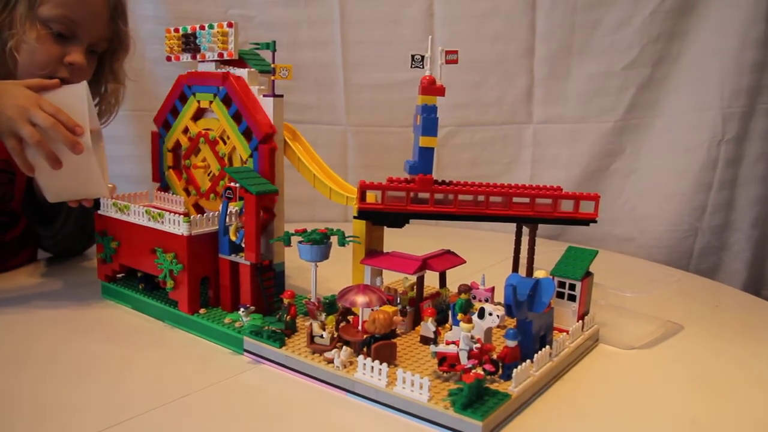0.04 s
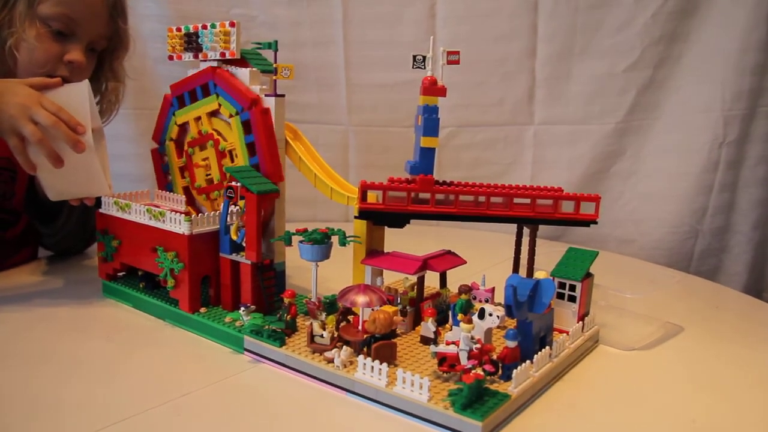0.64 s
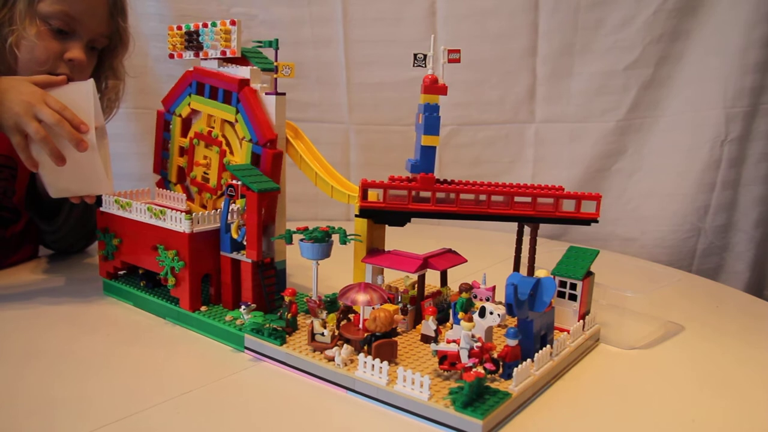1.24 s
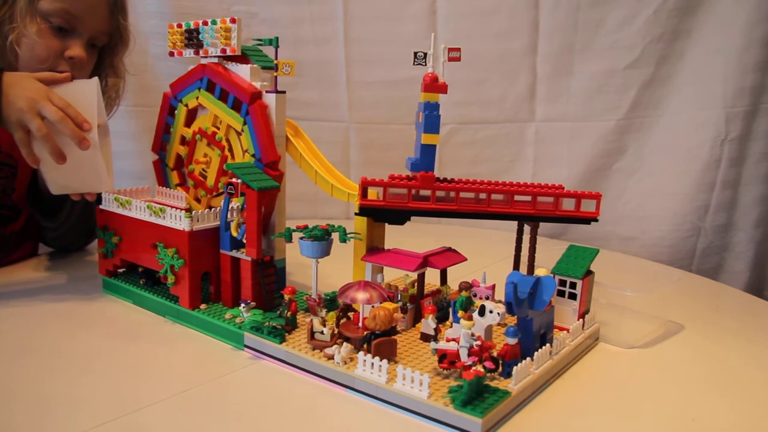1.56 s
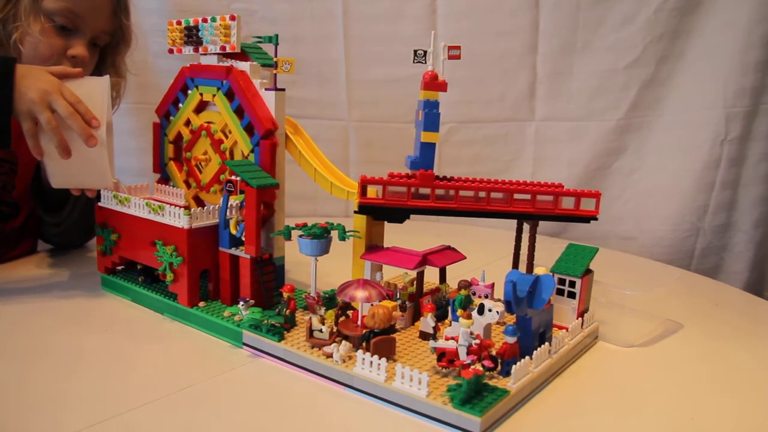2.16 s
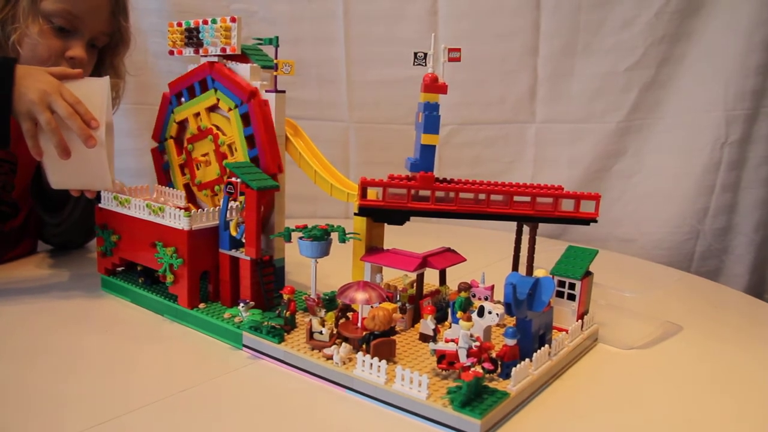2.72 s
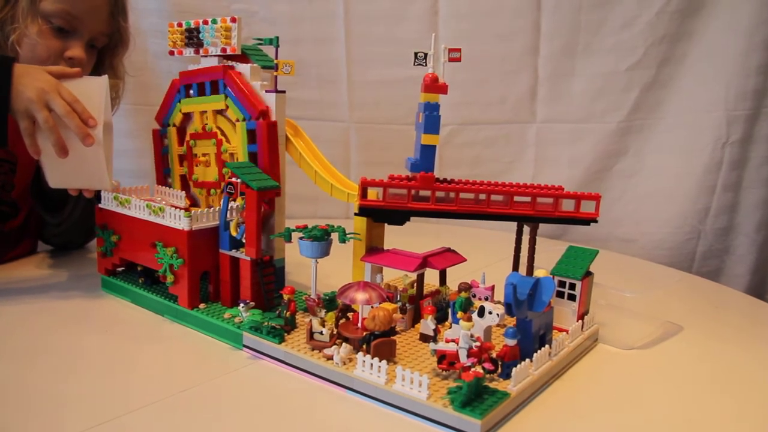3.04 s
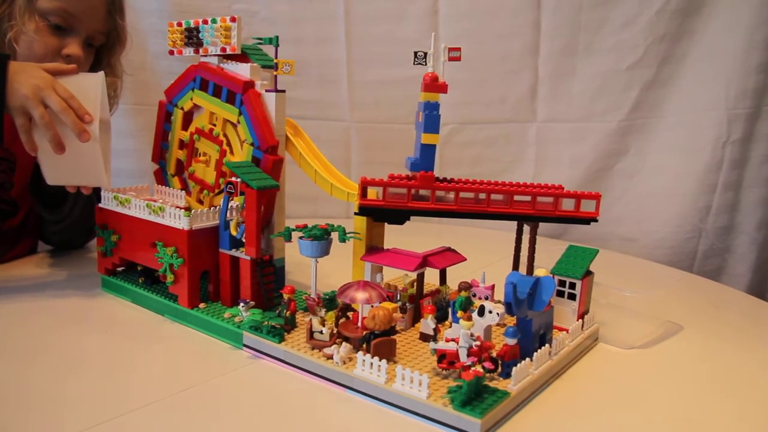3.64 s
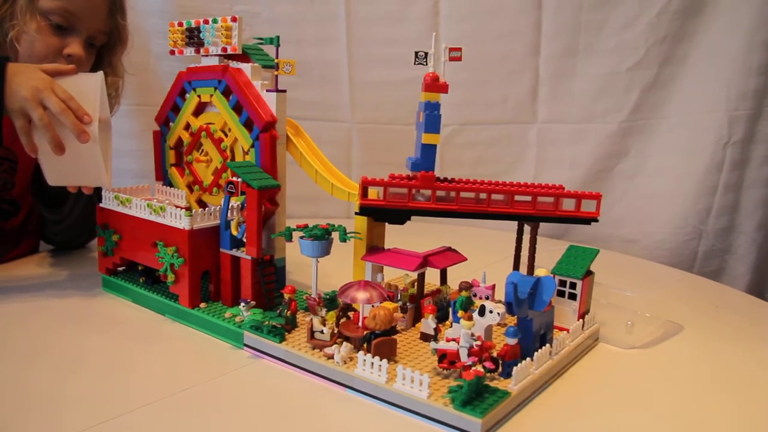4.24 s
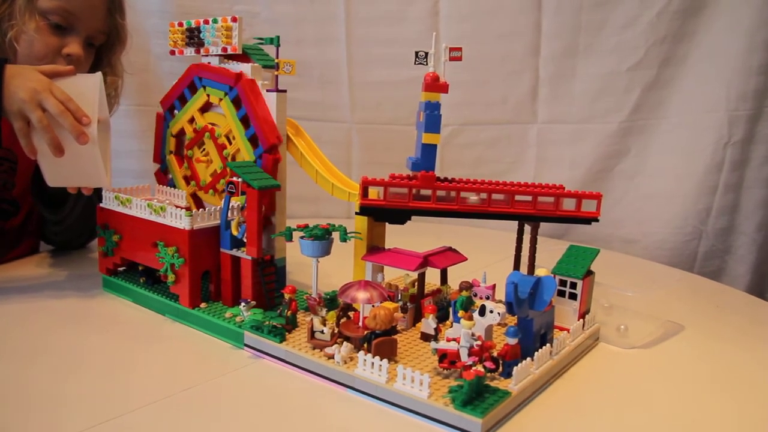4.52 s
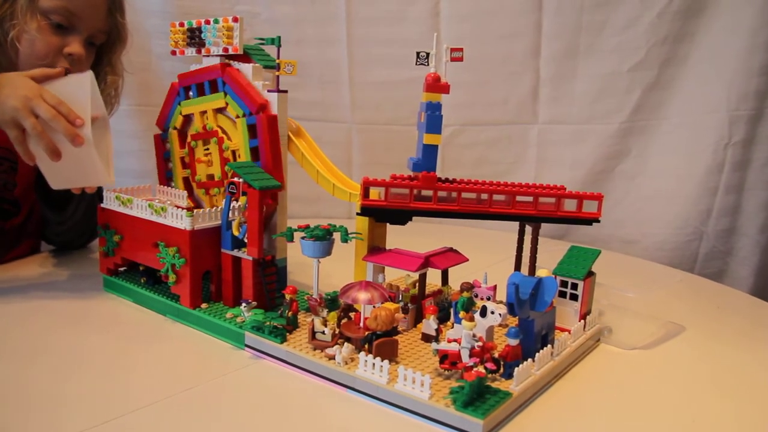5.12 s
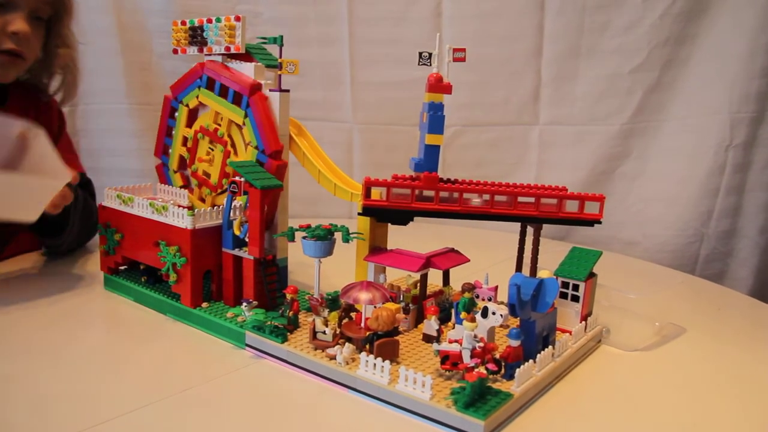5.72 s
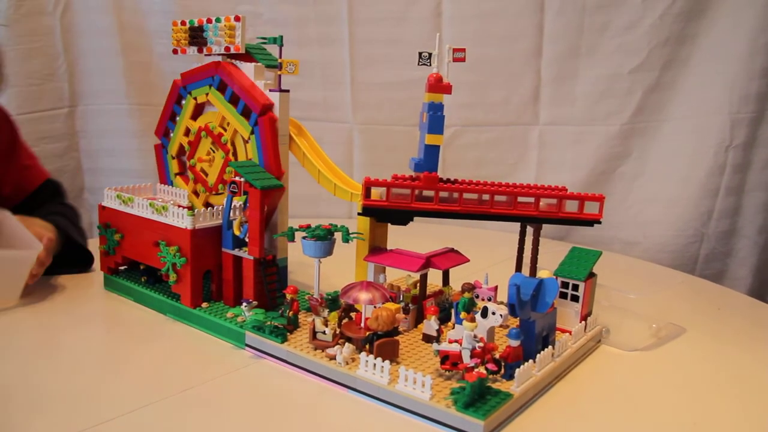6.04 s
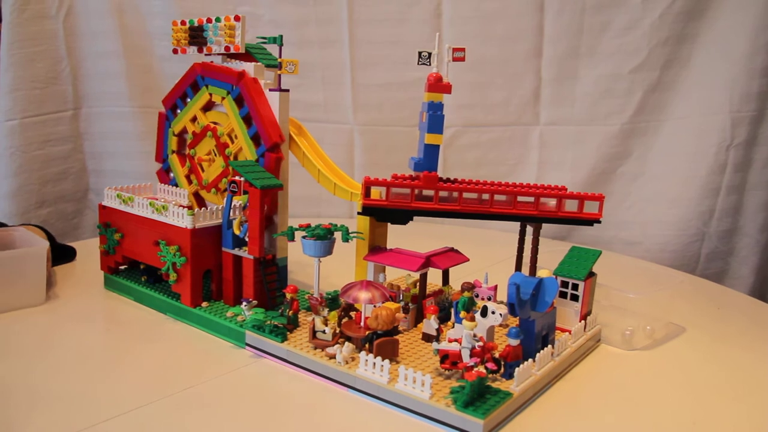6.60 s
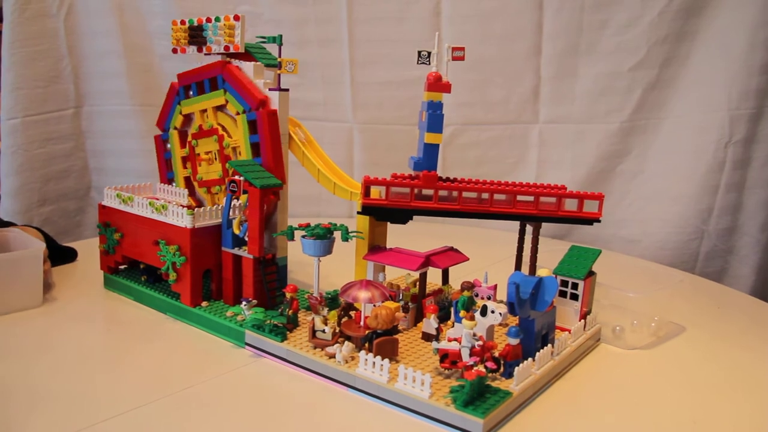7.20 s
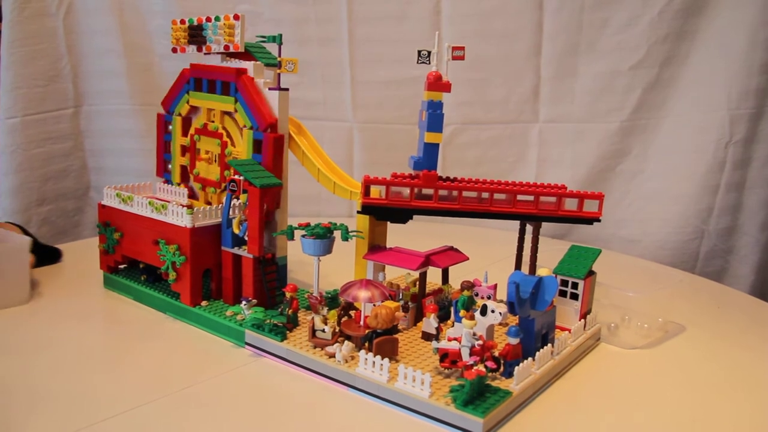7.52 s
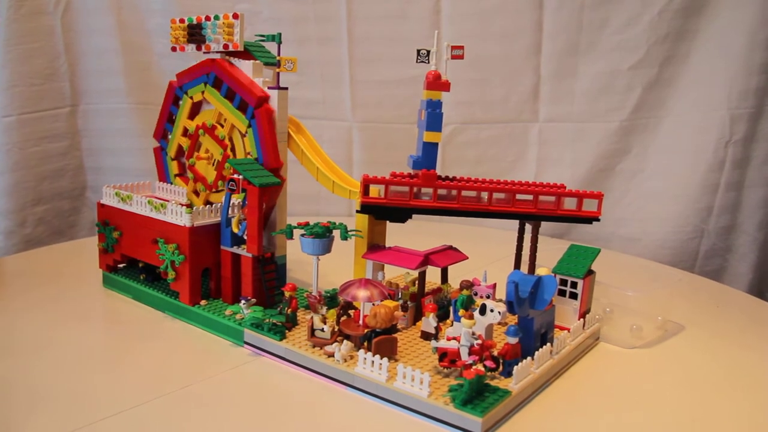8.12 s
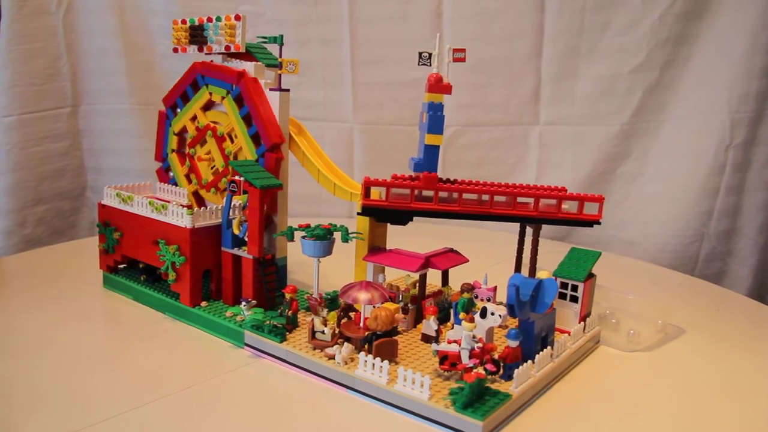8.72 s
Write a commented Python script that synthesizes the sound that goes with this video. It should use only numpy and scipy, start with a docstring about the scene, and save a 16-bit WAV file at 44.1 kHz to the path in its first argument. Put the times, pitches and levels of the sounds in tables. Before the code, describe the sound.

Small plastic balls pour from a tub into the hopper of a toy-brick machine, popping and rattling from the very start. The clatter thins between about 1.5 and 2 seconds, surges in its strongest gush at about 2.2 seconds and continues until about 4 seconds. Balls then drop on to hollow plastic with sharp clunks at about 4.1 seconds, and louder at 5.1, 6.4, 6.9 and 8.7 seconds. From about 4.5 seconds to the end, balls click and chatter down a slide and purr along a studded bridge in short, swelling runs. A little motor and its gears whirr faintly throughout, wavering slightly and dipping around 4.5 seconds. Underneath, the table rumbles softly, with a few dull bumps, the clearest at about 7.3 seconds. A short living-room echo follows the hits, and the loudest ones distort slightly.

```python
"""In a living room, a motorised toy-brick machine runs on a table. Small plastic balls pour
from a tub into its hopper (the bin that feeds it), popping and rattling as they land.
A little motor whirrs and the table rumbles. Then balls drop with hollow clunks, click down
a slide and roll along a bridge. Each hit is a sharp crack plus a short ring of the struck
plastic. The room echoes after the hits, and the loudest ones distort."""
import sys
import numpy as np
from scipy import signal
from scipy.fft import rfft, irfft
from scipy.io import wavfile
from scipy.ndimage import uniform_filter1d

SR = 44100
rng = np.random.default_rng(int(sys.argv[2]) if len(sys.argv) > 2 else 0)


def master(y):
    """Save y as 16-bit WAV."""
    cut = np.clip(np.atleast_2d(y).T, -1, 1)
    pcm = np.round(cut * 32767)  # scale
    wavfile.write(sys.argv[1], SR, pcm.astype(np.int16))


N = 386316

# the loudest balls landing in the hopper: t/s, ring level/dB, crack level/dB
LANDINGS = [(0.018, -20, -21.5), (0.068, -14, -14.5), (0.126, -18, -37), (0.147, -25, -22.5),
            (0.194, -13, -14.5), (0.227, -19, -23), (0.359, -16, -17), (0.415, -15.5, -20),
            (0.478, -18, -26.5), (0.558, -13, -17), (0.605, -18.5, -26), (0.649, -22, -19.5),
            (0.755, -25.5, -25.5), (0.789, -26.5, -28), (0.907, -37, -33), (0.998, -30, -33),
            (1.0863, -12.5, -14.5), (1.15, -12.5, -25), (1.178, -32, -27), (1.196, -21, -32),
            (1.234, -25.5, -24.5), (1.271, -36, -24), (1.295, -22.5, -24), (1.323, -19.5, -25),
            (1.44, -32, -20), (1.491, -24, -23.5), (1.742, -31, -25.5), (1.935, -26, -21),
            (2.053, -33, -23), (2.109, -33, -25), (2.162, -19, -16), (2.245, -9.5, -10.5),
            (2.302, -15.5, -13), (2.379, -9.5, -14.5), (2.426, -12.5, -18.5), (2.47, -10, -23),
            (2.497, -12, -16.5), (2.56, -13.5, -16), (2.602, -14.5, -14.5), (2.635, -14, -18),
            (2.683, -13, -16), (2.724, -15, -20), (2.753, -15, -23), (2.783, -14, -18.5), (2.81, -16, -18),
            (2.871, -18, -17.5), (2.993, -21, -27), (3.033, -18.5, -22.5), (3.099, -21, -24.5),
            (3.14, -17, -16.5), (3.203, -21.5, -24), (3.283, -15, -15), (3.366, -17, -20),
            (3.44, -17.5, -21.5), (3.515, -16.5, -14.5), (3.586, -17.5, -21), (3.621, -21, -14),
            (3.647, -14.5, -17.5), (3.701, -35, -21), (3.719, -16, -21), (3.759, -21, -27.5),
            (3.925, -15.5, -16), (3.998, -16, -20.5), (4.035, -14, -14)]
# gushes of balls that stir the heap: start t/s, end t/s, level/dB
POUR_GUSHES = [(-0.1, 0.196, -26), (0.34, 0.805, -30.5), (1.215, 1.333, -29.5), (1.44, 1.575, -40.5),
               (2.28, 2.852, -24), (2.86, 3.812, -30), (3.78, 4.085, -33)]
# balls speeding up down the tilted tub: start t/s, end t/s, full-speed level/dB
TUB_SLIDES = [(2.0, 2.19, -26)]
# motor and gear tones: f/Hz, level/dB
MOTOR_TONES = [(90.5, -59), (280, -60.5), (350, -56), (1098, -49), (1147, -51), (1798, -63), (2293, -49.5),
               (3445, -57.5), (4183, -80), (4813, -75)]
# how the motor's loudness changes: t/s, level/dB
MOTOR_LEVEL = [(0, 3.5), (1.3, 1.5), (1.8, 2.5), (2.2, 8), (2.8, 2.5), (4.5, -6), (5.2, 4.5), (8.76, 4)]
# how the table's rumble changes: t/s, level/dB
RUMBLE_LEVEL = [(0, -53.5), (1.2, -56), (1.5, -48), (2.15, -52), (2.4, -49.5), (4.5, -57.5), (5.1, -41.5),
                (5.7, -49), (6.4, -49), (7.0, -54), (7.35, -41), (7.7, -46.5), (8.76, -53)]
# soft bumps that reach the table: t/s, level/dB
TABLE_BUMPS = [(1.29, -40), (3.261, -45), (4.304, -40.5), (7.337, -35)]
# balls hitting plastic: t/s, ring level/dB, crack level/dB, hardness (extra treble)/dB
DROP_HITS = [(4.1021, -13, -11.5, 1), (4.1945, -14, -15.5, 4.5), (4.267, -29.5, -28, -5),
             (4.6393, -25, -17.5, -4), (5.1447, -4.5, -9, 5), (5.1918, -17, -19.5, -4),
             (6.4088, -3.5, -8, 4), (6.4452, -20, -20.5, -3), (6.4906, -20.5, -24.5, -2),
             (6.8622, -7, -10, 2.5), (8.7037, -7.5, -8.5, 3)]  # falling on hollow parts
TRACK_HITS = [(4.512, -31.5, -44, -9), (4.572, -46, -21.5, -9), (4.788, -30, -24, -3),
              (4.837, -33, -33, -3), (4.92, -27.5, -40, 1), (4.96, -23, -32, -18), (5.044, -29, -25, -9),
              (5.093, -24, -16, 7), (5.34, -27, -13, 2), (5.384, -13, -15, 14), (5.409, -18, -21, 12),
              (5.429, -14.5, -17, 5), (5.491, -14.5, -18.5, -5), (5.546, -16, -21.5, -18),
              (5.776, -25, -19, 0), (5.824, -22, -16, 10), (5.879, -25, -18.5, 11), (5.919, -42, -19, 8),
              (5.989, -21.5, -16.5, 5), (6.023, -23, -19, 0), (6.056, -22, -14, 16),
              (6.122, -20, -13, 11.5), (6.17, -18, -14.5, -5), (6.22, -19.5, -32, -11),
              (6.526, -18, -30, 0), (6.639, -17.5, -22, 3), (6.664, -21.5, -17, -12),
              (6.731, -14, -19.5, 6), (6.773, -29, -23.5, -1), (6.982, -27, -31, -16),
              (7.051, -22, -20, -13), (7.101, -27, -21, -7), (7.132, -32, -19.5, 9), (7.152, -16, -21.5, 5),
              (7.179, -31, -23, 10), (7.22, -31, -23.5, 1), (7.256, -21.5, -26, 1), (7.312, -26, -18, -4),
              (7.376, -21.5, -23, 4), (7.388, -23, -21, 19), (7.424, -22, -11.5, 9), (7.473, -23, -17, -3),
              (7.478, -18, -23, 9), (7.542, -13.5, -20, -1), (7.65, -27, -17, 8), (7.696, -25, -23, 8),
              (7.755, -19.5, -19, 2), (7.848, -35, -18, 13), (7.887, -36, -14, 10), (7.907, -33, -18, -3),
              (7.952, -18.5, -15.5, 8), (8.007, -23.5, -14, 10.5), (8.062, -17.5, -20.5, 10),
              (8.131, -21, -22, 0), (8.34, -20.5, -24, -14), (8.426, -15.5, -15, 30),
              (8.518, -15, -12.5, -8), (8.648, -23.5, -45, -4)]  # striking the bricks of the track
# balls speeding up along the bridge: start t/s, end t/s, full-speed level/dB
BRIDGE_RUNS = [(5.12, 5.33, -26.5), (5.7, 6.07, -25.5), (6.6, 6.82, -36), (7.05, 7.34, -27),
               (7.62, 7.91, -22.5), (8.2, 8.38, -27.5)]

# the tones each part rings with: f/Hz, level/dB, t60/s (the time to fade by 60 dB)
HOPPER_TONES = [(703, -20.5, 0.035), (1047, -4.5, 0.013), (1270, 2, 0.028), (1547, -6.5, 0.025),
                (1777, -20, 0.027), (2615, -17.5, 0.028), (3175, -15.5, 0.014)]
HEAP_TONES = [(674, -8.5, 0.053), (863, -2, 0.021), (1090, -0.5, 0.021), (1280, -1.5, 0.047),
              (1510, 3, 0.028), (1777, -2, 0.029), (2280, -0.5, 0.014)]  # the pile of balls in the hopper
TABLE_TONES = [(107, -14, 0.16), (132, -11, 0.14), (165, 0, 0.079)]
TUB_TONES = [(845, 5, 0.034), (970, -3, .05), (1020, 8, 0.038), (1153, -14, 0.063)]
DROP_TONES = [(770, 0, .013), (900, -7, .013), (1220, -5, .009), (1650, -9, .007)]  # hollow plastic under a falling ball
TRACK_TONES = [(714, -11.5, 0.047), (917, -8, 0.02), (1304, -8, 0.043), (1760, 3.5, 0.02), (2138, 0, 0.024),
               (2468, 2.5, 0.02), (3140, 0, 0.011)]
BRICK_TONES = [(4395, 1.5, 0.013), (5266, 3.5, 0.014), (5800, -3.5, 0.013)]  # one brick on its own
BRIDGE_TONES = [(283, -10, 0.17), (361, 1, 0.09), (454, -4.5, 0.081), (730, -16, 0.017), (1000, 10, 0.038),
                (1430, 12, 0.03), (1810, 6.5, 0.041), (4150, 2, 0.044), (4250, 15, 0.022), (5300, 6, 0.016),
                (5750, 15, 0.015)]

# the colour of each noise, or how strong it is from low to high: f/Hz, level/dB
HOPPER_COLOUR = [(150, -26.5), (600, -14.5), (1800, -1.5), (3700, -1.5), (4600, 1), (5500, -1.5),
                 (6300, -8.5), (7500, -11.5), (10000, -17), (11800, -33), (16000, -42)]  # crack of a landing
GEAR_COLOUR = [(20, -7), (50, -32), (80, -20), (120, 5), (170, 8), (210, 3), (290, 10.5), (480, 2),
               (700, 13.5), (1200, 11), (2300, 1.5), (3200, 3), (5000, -18.5), (7000, -40), (11000, -39),
               (16000, -40)]  # gears and room air
RUMBLE_COLOUR = [(20, -25), (45, -18), (65, -11), (90, -11), (135, 2.5), (170, -3.5), (205, -5.5),
                 (280, -2.5), (330, -9), (480, -4), (900, -39), (4000, -51)]  # table top
DROP_COLOUR = [(100, -22.5), (400, -14), (540, -20), (680, -3), (1000, -4.5), (1800, 1.5), (3300, -2.5),
               (4400, 1.5), (5500, -3), (7500, -13.5), (10000, -21.5), (12000, -30), (16000, -41)]  # crack of a fall
TRACK_COLOUR = [(150, -35), (1200, -4), (2600, -1), (3700, -1), (4300, 1), (4750, 3.5), (5350, -1.5),
                (5800, -4.5), (6600, -7.5), (7800, -11.5), (10000, -18), (11800, -31.5), (16000, -40)]  # crack on the track
# how long the room echoes: f/Hz, t60/s
ECHO_TIMES = [(200, 0.25), (600, 0.62), (1400, 0.64), (3700, 0.33), (7000, 0.47), (13000, 0.26)]

HIT_TIME = np.arange(SR // 8) / SR  # seconds into one hit


def gain(db):
    """Turn decibels into a number to multiply by."""
    return 10 ** (np.asarray(db) / 20)


def unit(x):
    """Scale a signal to an average size (rms) of 1."""
    return x / np.sqrt(np.mean(x ** 2))


def curve(rows):
    """Join (time, level) points with straight lines."""
    times, levels = np.transpose(rows)
    return np.interp(np.arange(N) / SR, times, levels)


def since(s):
    """Seconds gone by since time s; 0 before it."""
    return np.maximum(np.arange(N) / SR - s, 0)


def fade(t, t60):
    """Die away smoothly, 60 dB down after t60 seconds."""
    return np.exp(-np.log(1000) * t / t60)


def wander(rate):
    """A smooth random drift that takes a new turn `rate` times a second."""
    step = int(SR / rate)
    stairs = np.repeat(rng.standard_normal(N // step + 1), step)
    return unit(uniform_filter1d(stairs, step)[:N])


def add(out, s, sound):
    """Mix a sound in at time s."""
    i = max(int(s * SR), 0)
    out[i:i + len(sound)] += sound[:max(N - i, 0)]


def colour(x, points, size=2048):
    """Turn the lows and highs of a sound up or down to follow (Hz, dB) points."""
    hz, db = np.transpose(points)
    f = np.maximum(np.arange(size // 2 + 1) * SR / size, 1)
    gains = gain(np.interp(np.log(f), np.log(hz), db))
    # rearrange the filter so that no sound comes out ahead of the hit
    cepstrum = irfft(np.log(gains))
    cepstrum[1:size // 2] *= 2
    cepstrum[size // 2 + 1:] = 0
    return signal.fftconvolve(x, irfft(np.exp(rfft(cepstrum))))[:len(x)]


def cut_bass(x, hz, order):
    """Small parts push hardly any bass into the air."""
    return signal.sosfilt(signal.butter(order, hz, "high", fs=SR, output="sos"), x)


def unit_hit(x):
    """Scale a hit so that its first 7 ms have an average size (rms) of 1."""
    return x / np.sqrt(np.mean(x[:SR // 147] ** 2))


def ring(tones, scatter_db=2, detune=0.018, rise_s=0.00027):
    """A struck part rings; each spot gives its tones a slightly different strength and pitch."""
    hz, db, t60 = np.transpose(tones)[:, :, None]
    weight, shift, side = rng.standard_normal((3, len(tones), 1))
    waves = np.sign(side) * np.sin(2 * np.pi * hz * (1 + detune * shift) * HIT_TIME)
    ringing = np.sum(gain(db + scatter_db * weight) * waves * fade(HIT_TIME, t60), axis=0)
    swell = 1 - np.exp(-HIT_TIME / rise_s)  # a hollow part takes a moment to fill with sound
    return unit_hit(swell * ringing)


def crack(spectrum, t60, hard_db=0):
    """The plastic's many high tones blur into a burst, coloured by where and how hard it is hit."""
    hz, db = np.transpose(spectrum)
    spot_db = 3 * rng.standard_normal(len(hz))
    treble = np.interp(hz, [5500, 8000], [0, 1])
    linger = gain(-17) * fade(HIT_TIME, t60=0.046)
    burst = rng.standard_normal(len(HIT_TIME)) * (fade(HIT_TIME, t60) + linger)
    return unit_hit(colour(burst, np.column_stack([hz, db + spot_db + hard_db * treble])))


def hits(rows, tones, spectrum, crack_t60, scatter_db, detune, rise_s):
    """Each ball rings the part it strikes, cracks and bounces once: returns (rings, cracks)."""
    rings, cracks = np.zeros((2, N))
    loudest_db = np.array(rows)[:, 2].max()
    for s, ring_db, crack_db, hard_db in rows:
        stretch = 0.5 + 0.14 * (loudest_db - crack_db)  # a light, glancing touch scrapes for longer
        bounce_s = s + rng.uniform(0.003, 0.014)
        add(rings, s, gain(ring_db) * ring(tones, scatter_db, detune, rise_s))
        add(cracks, s, gain(crack_db) * crack(spectrum, crack_t60 * stretch, hard_db))
        add(cracks, bounce_s, gain(crack_db - 11) * crack(spectrum, crack_t60, hard_db))
    return rings, cracks


def rattle(tones, spectrum, crack_t60, crack_db, rate, spread_db, spots=12):
    """Many small random taps; each spot that gets hit comes alive in short flurries of bounces."""
    out = np.zeros(N)
    for _ in range(spots):
        flurry = np.maximum(wander(22), 0) * 2.5
        at = np.flatnonzero(rng.random(N) < flurry * rate / spots / SR)
        taps = np.zeros(N)
        taps[at] = gain(spread_db * rng.uniform(-0.84, 1, len(at)))
        tap_sound = ring(tones) + gain(crack_db) * crack(spectrum, crack_t60)
        out += signal.oaconvolve(taps, tap_sound)[:N]
    return unit(out)


def downhill(rows, stop_t60, power):
    """Balls on a slope get louder as they gather speed, then fade when the run ends."""
    return sum(gain(db) * np.minimum(since(start) / (end - start), 1) ** power
               * fade(since(end), stop_t60) for start, end, db in rows)


def heap_level(rise_s=0.071, settle_t60=0.89):
    """The heap starts to move with each gush, keeps going while it lasts, then settles."""
    gushes = [gain(db) * np.minimum(since(start) / rise_s, 1) * fade(since(end), settle_t60)
              for start, end, db in POUR_GUSHES]
    return np.max(gushes, axis=0)


def hopper():
    """Balls slide out of the tub and tumble on to the heap, which shifts and settles."""
    # harder landings are brighter: 0.25 dB more treble for each dB of ring
    landings = [(s, ring_db, crack_db, 0.5 + 0.25 * (ring_db + 20)) for s, ring_db, crack_db in LANDINGS]
    pops, cracks = hits(landings, HOPPER_TONES, HOPPER_COLOUR,
                        crack_t60=0.011, scatter_db=2, detune=0.018, rise_s=0.00096)
    heap = rattle(HEAP_TONES, HOPPER_COLOUR, crack_t60=0.012, crack_db=1.5, rate=200, spread_db=6.5)
    tub = rattle(TUB_TONES, HOPPER_COLOUR, crack_t60=0.016, crack_db=-18, rate=650, spread_db=6, spots=4)
    clatter = cracks + heap * heap_level() + tub * downhill(TUB_SLIDES, stop_t60=1.3, power=3.1)
    # the open hopper aims its pop forward, so less of it reaches the walls
    echoes = room(gain(-7.5) * pops + gain(-3) * clatter)
    return cut_bass(pops + clatter + echoes, hz=466, order=3)


def echo_tail(onset_s=0.0045):
    """The walls answer a click with a wash of echoes that lasts longest at middle pitches."""
    t = np.arange(SR) / SR
    f = np.maximum(np.arange(SR // 2 + 1), 1)
    hz, t60 = np.transpose(ECHO_TIMES)
    noise = rfft(rng.standard_normal(SR))
    bands = (irfft(noise * np.interp(np.log(f), np.log(hz), share), SR) for share in np.eye(len(hz)))
    tail = sum(band * fade(t, decay) for band, decay in zip(bands, t60))
    tail *= np.clip(2 * t / onset_s - 1, 0, 1)  # echoes arrive a moment late
    tail /= np.sqrt(np.sum(tail ** 2))
    return colour(tail, [(300, 1.7), (800, -2), (1200, -2), (2500, -2.6), (5000, -4), (13000, -4)])


def room(x):
    """Just the echoes; the balls move about, so the echo pattern keeps changing."""
    place = 2 * wander(6)
    return sum(signal.oaconvolve(x * share, echo_tail())[:N] for share in (np.cos(place), np.sin(place)))


def motor(wobble=0.0042, flutter_db=1.8):
    """A small motor hums at a wavering speed while its gears whirr."""
    motor_time = np.cumsum(1 + wobble * wander(9)) / SR
    hum = sum(gain(db + flutter_db * wander(25)) * np.sin(2 * np.pi * hz * motor_time)
              for hz, db in MOTOR_TONES)
    gears = unit(colour(rng.standard_normal(N), GEAR_COLOUR)) * gain(2.5 * wander(40))
    return (gain(-1) * hum + gain(-44) * gears) * gain(curve(MOTOR_LEVEL))


def table_top():
    """The table rumbles under the machine and takes a few dull bumps."""
    out = unit(colour(rng.standard_normal(N), RUMBLE_COLOUR)) * gain(curve(RUMBLE_LEVEL))
    for s, db in TABLE_BUMPS:
        add(out, s, gain(db) * ring(TABLE_TONES))
    return out


def whine(hz=15617):
    """A very faint, very high electronic tone."""
    return gain(-76) * np.sin(2 * np.pi * hz * np.arange(N) / SR)


def drops():
    """Falling balls make a short hollow clunk; it is mostly their crack that fills the room."""
    clunks, cracks = hits(DROP_HITS, DROP_TONES, DROP_COLOUR,
                          crack_t60=0.013, scatter_db=4.5, detune=0.012, rise_s=0.0011)
    clunks = cut_bass(clunks, hz=590, order=5)
    echoes = room(gain(-11) * clunks + gain(-0.5) * cracks)
    return cut_bass(clunks + cracks + echoes, hz=275, order=2)


def track():
    """Balls click along the slide, chatter between its walls and purr over the bridge's studs."""
    rings, cracks = hits(TRACK_HITS, TRACK_TONES, TRACK_COLOUR,
                         crack_t60=0.013, scatter_db=3, detune=0.052, rise_s=0.00017)
    chatter = rattle(TRACK_TONES, TRACK_COLOUR,
                     crack_t60=0.0092, crack_db=-3.5, rate=220, spread_db=10.5)
    bridge = rattle(BRIDGE_TONES, TRACK_COLOUR,
                    crack_t60=0.017, crack_db=-4, rate=400, spread_db=2.5, spots=8)
    bridge *= downhill(BRIDGE_RUNS, stop_t60=0.3, power=0.89)
    direct = rings + gain(-2) * cracks + brick_pings() + chatter * chatter_level() + bridge
    return cut_bass(direct + gain(-3) * room(direct), hz=222, order=2)


def brick_pings():
    """Every brick that a ball meets pings at a slightly different pitch."""
    out = np.zeros(N)
    for s, _, crack_db, _ in TRACK_HITS:
        add(out, s, gain(crack_db - 4) * ring(BRICK_TONES, scatter_db=1.5, detune=0.026, rise_s=0.0004))
    return out


def chatter_level(chatter_db=-10, calm_t60=0.36, roll_db=-36.5, start_s=4.64):
    """Every click shakes the balls up, and then they calm down to a steady roll."""
    kicks = np.zeros(N)
    for s, ring_db, crack_db, _ in TRACK_HITS:
        add(kicks, s, np.array([gain(ring_db) ** 2 + gain(crack_db - 4) ** 2]))
    energy = signal.lfilter([1], [1, -fade(1 / SR, calm_t60) ** 2], kicks)  # each kick leaks away
    shaking = gain(chatter_db) * np.sqrt(energy)
    return np.hypot(shaking, gain(roll_db)) * (since(start_s) > 0)


def scene():
    """All the sounds of the machine, added into one channel."""
    return (hopper() + motor() + table_top() + whine() + drops() + track())[None]


def record(dry, top_hz=16300):
    """Flatten the peaks of the loudest clacks, then cut the very highest treble."""
    treble_cut = signal.ellip(8, 0.2, 70, top_hz, fs=SR, output="sos")
    return signal.sosfilt(treble_cut, np.clip(dry, -1, 1))


dry = scene()
out = record(dry)
master(out)
```